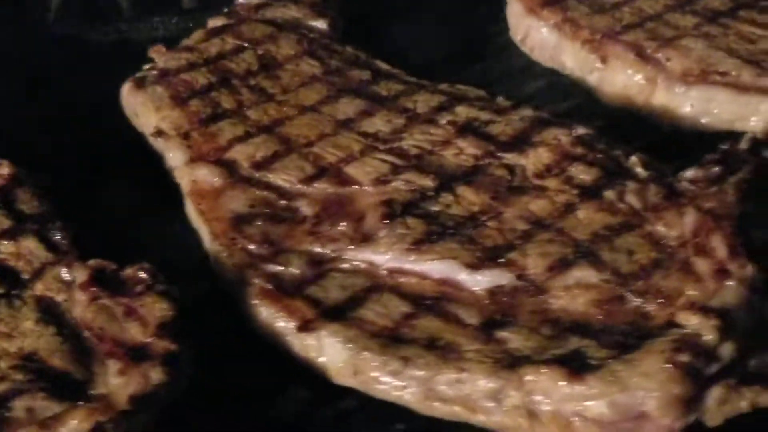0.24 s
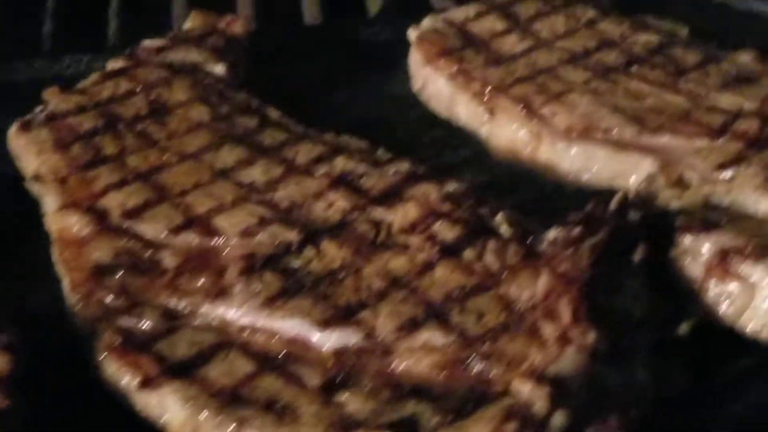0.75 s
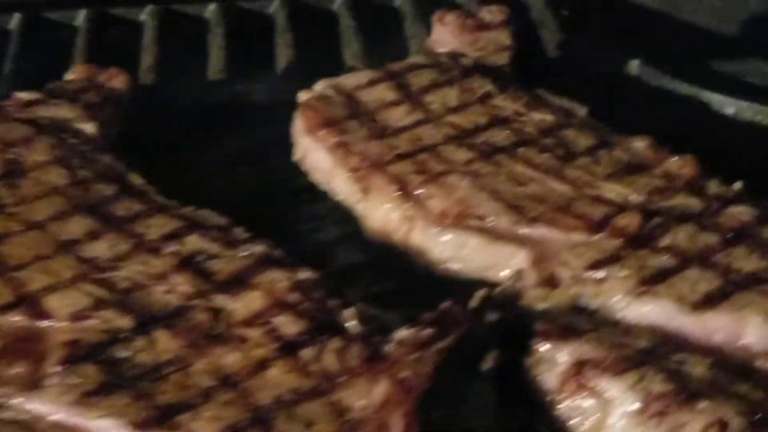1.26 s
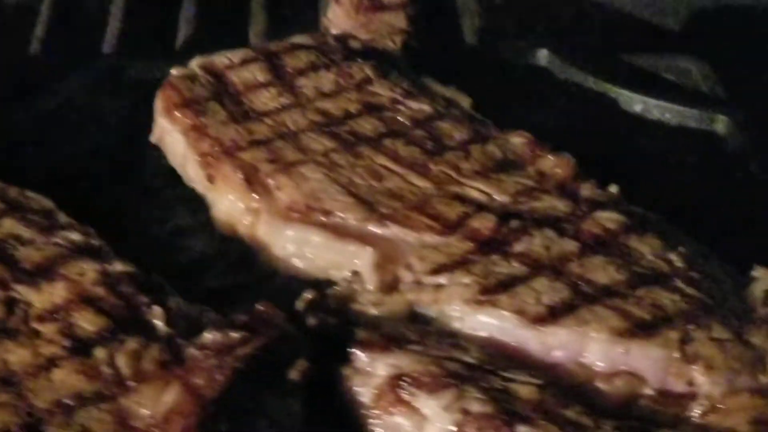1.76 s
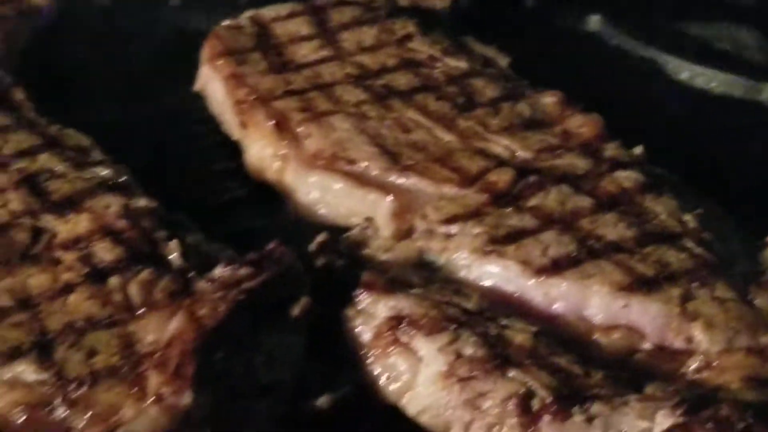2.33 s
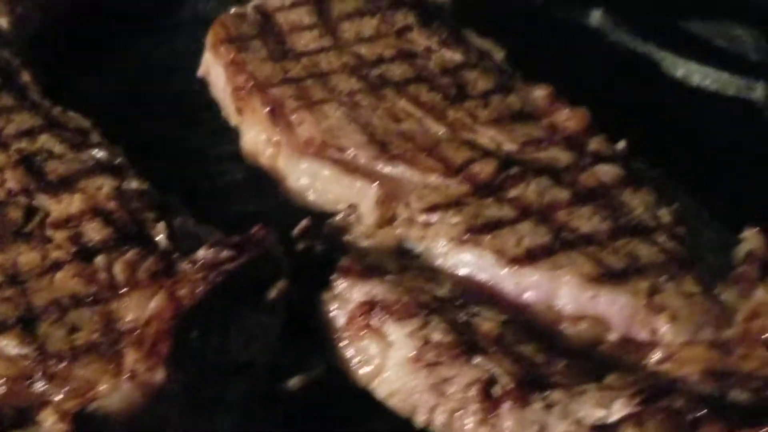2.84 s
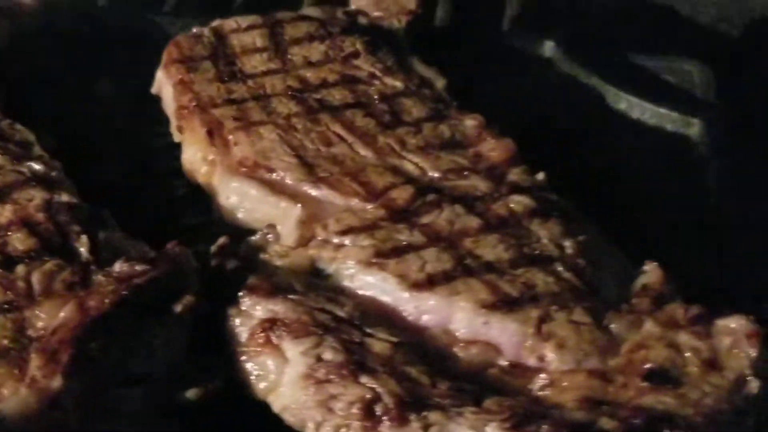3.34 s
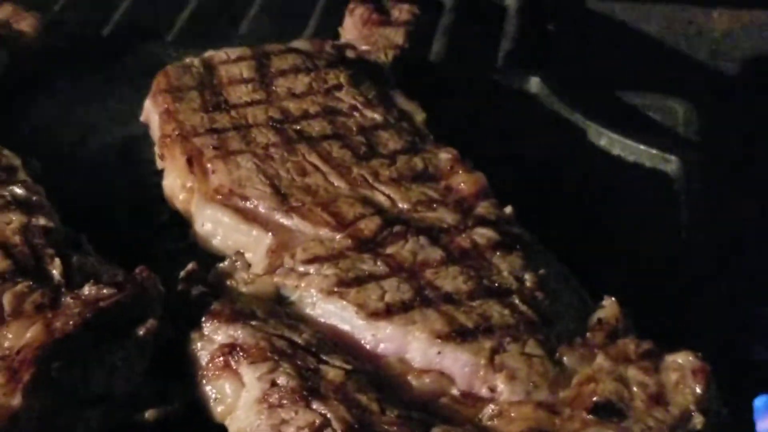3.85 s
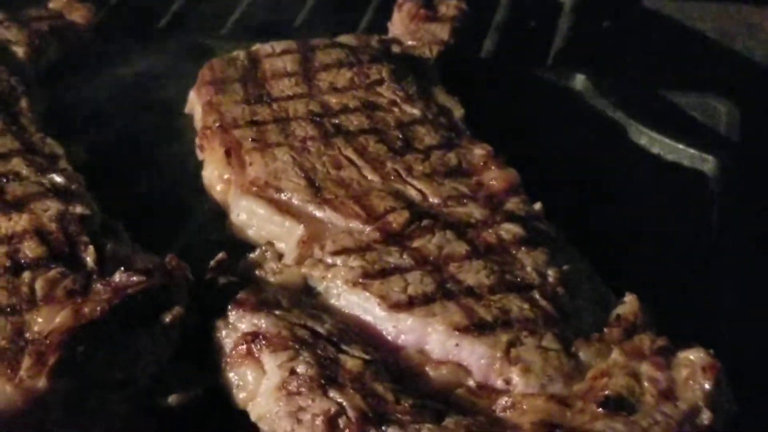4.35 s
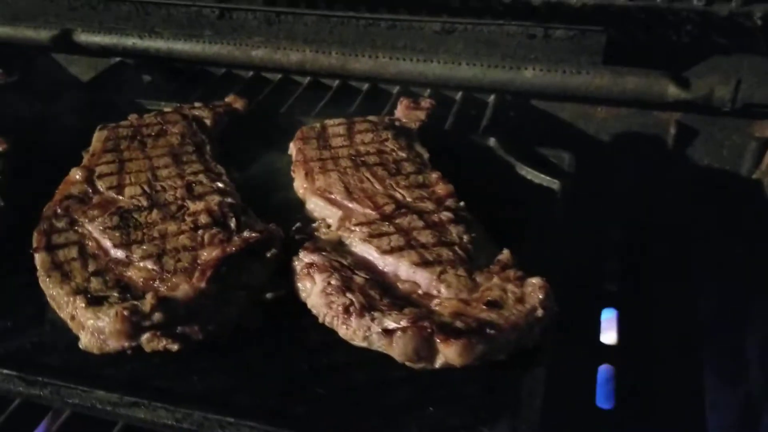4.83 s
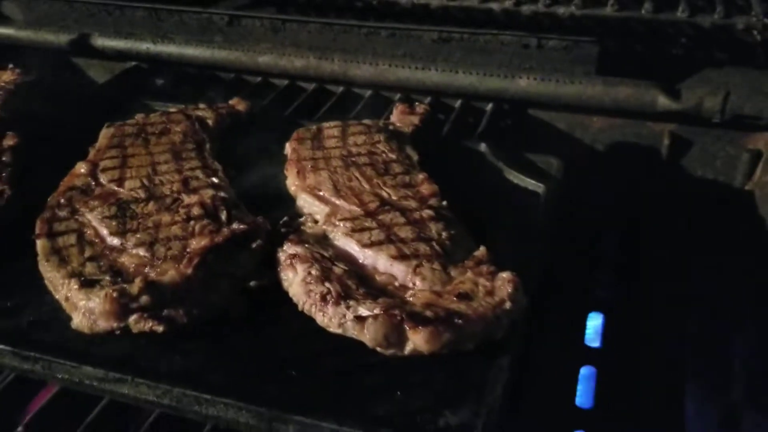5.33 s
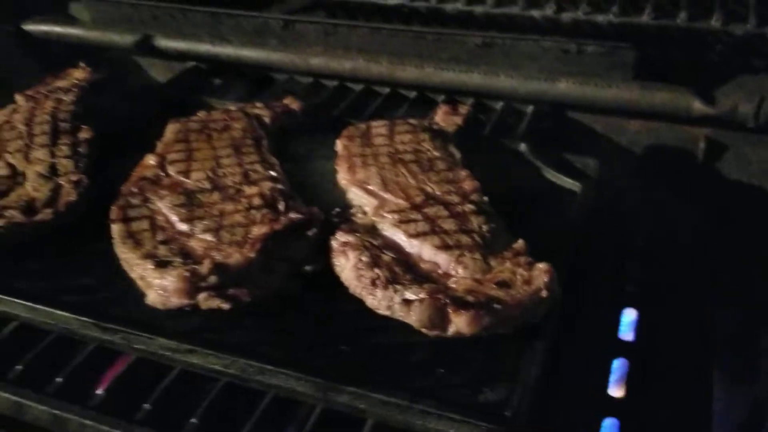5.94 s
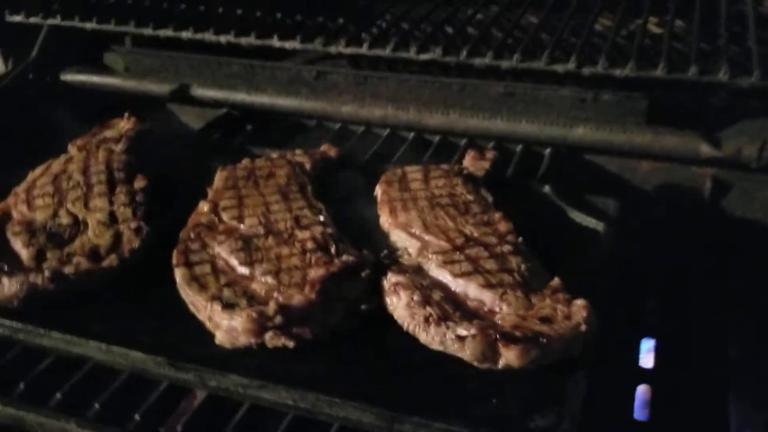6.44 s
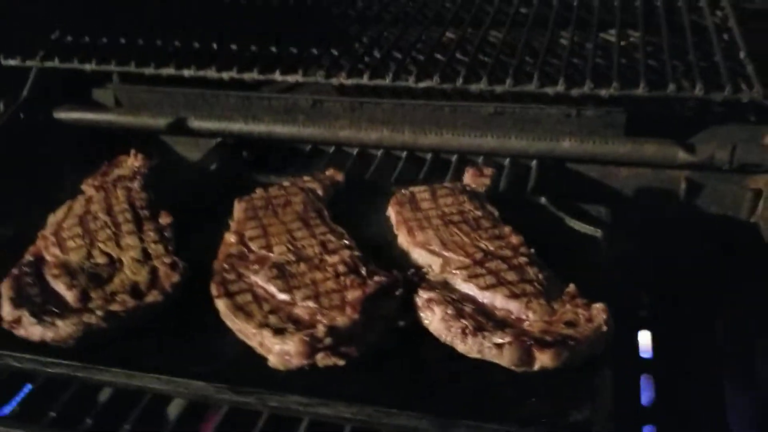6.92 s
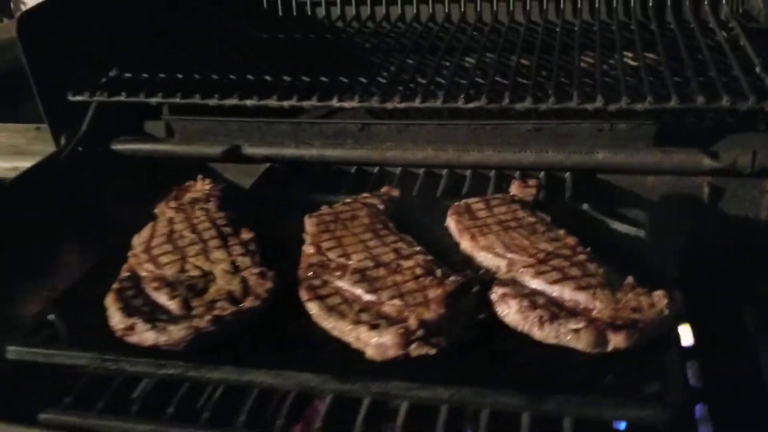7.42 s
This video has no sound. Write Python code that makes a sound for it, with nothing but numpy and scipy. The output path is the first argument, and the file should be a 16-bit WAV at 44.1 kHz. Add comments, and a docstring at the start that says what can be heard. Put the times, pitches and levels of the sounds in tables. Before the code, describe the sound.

From the first moment, steaks sizzle strongly on a gas grill, close to a hand-held stereo microphone: a dense, bright hiss grained with tiny crackles and faint squeaky pips. Hard grease snaps cluster at 0.15-0.7 seconds, the biggest near 0.2, with short juicy spits and a speck striking the microphone. Between 1.1 and 3.1 the sizzle eases slightly while crisp pops scatter, many toward the left, with a spit near 1.8. It swells around 3.8-4.0 with wet spits and a soft low knock; sharp snaps follow at 4.1-4.7. From 4.9 the frying thins, faintest near 5.6, though isolated pops still jump out at 5.55 and 5.9. It builds again after 6, with spits and a bright snap near 7.2, strong by 7.3, and continues to the end around 7.7. Burners rumble softly below throughout, swelling with the sizzle; only a short, tight reflection colours the pops.

```python
"""Steaks sizzle on a hot gas grill, close to a hand-held camera with two microphone ports.
From the start, tiny bubbles of juice burst into a strong hiss; larger ones pop, juice spits, fat specks strike.
Hiss, small pops and rumble swell and sink as the camera moves: faintest near 5.6 s, strong again by 7.3 s.
Bursts are random impulses through resonances, steam is filtered noise, and pops are short impulse responses.
Throughout, the burners rumble below as low coloured noise with broad resonances."""
import sys
import numpy as np
from scipy import signal
from scipy.fft import rfft, irfft
from scipy.io import wavfile

SR = 44100
rng = np.random.default_rng(int(sys.argv[2]) if len(sys.argv) > 2 else 0)


def inscribe(sig):
    """Save sig as 16-bit PCM at rate SR to the path in sys.argv[1].

    A 1-D sig is mono; a 2-D sig holds one channel per row.
    Samples are clipped to [-1, 1] before scaling.
    """
    pcm = np.round(np.clip(np.atleast_2d(sig).T, -1, 1) * 32767)
    wavfile.write(sys.argv[1], SR, pcm.astype(np.int16))


N = 338688
EDGE_HZ = 16000  # upper band limit
TAPS = 512  # length of the bursts' impulse responses, in samples


# loudness of the grill at the camera, before smaller fluctuations: (t/s, level/dB)
GRILL_LEVEL = [(0.0, -32), (0.17, -32), (0.68, -35.5), (1.11, -35), (1.92, -34.5), (2.39, -38),
               (2.82, -38.5), (2.95, -39.5), (3.16, -36.5), (3.31, -36.5), (3.85, -33.5), (4.17, -35.5),
               (4.66, -39), (4.88, -43.5), (5.62, -45), (5.94, -42.5), (6.07, -40.5), (6.52, -38),
               (6.89, -39), (7.12, -36), (7.31, -33.5), (7.68, -35.5)]
# turning of the camera, used as swing about its mean: (t/s, left minus right/dB)
SIZZLE_LEAN = [(0.0, 4.5), (4.9, 9), (7.68, 5)]


def sizzle():
    """Superposition: hiss, crackle and pips add, then share one level envelope and lean with the camera."""
    ticks = crackle(per_s=2600, spread_db=4.2, largest=4.2, octaves=.7, pan_db=1.5)
    fry = from_db(-2.5) * steam(likeness=0.19, patchy_db=1.5, flutter_hz=24.8)
    fry += from_db(-5.5) * lid(ticks, wet_db=-6.5, decay_s=0.0029, first_s=0.0027)
    fry += from_db(-16) * squeaks(count=2800, spread_db=5.5, decay_s=0.0016)
    lean_db = follow(SIZZLE_LEAN, axis=1)
    # the right port takes two thirds of the swing
    side_db = (lean_db - lean_db.mean()) * np.array([[.3], [-.6]])
    level_db = follow(GRILL_LEVEL, axis=1) + .5 * drift(3.4)
    return fry * from_db(level_db + side_db)


def steam(likeness, patchy_db, flutter_hz, count=7):
    """Partial coherence: the finest bubbles merge into a hiss, alike at both ports mainly at low frequency."""
    hz = np.fft.rfftfreq(N, 1 / SR)
    near, other = rfft(rng.standard_normal((2, N)))
    left_gain, right_gain = port_gains(hz)
    # the left port leads by 0.27 ms
    lag = np.exp(-2j * np.pi * hz * 0.00027)
    shared = np.clip(likeness, 0, 1) * lag / (1 + hz / 2500)
    far = shared * near + np.sqrt(1 - abs(shared) ** 2) * other
    spectra = np.array([near * left_gain, far * right_gain])
    # overlapping triangular bands, each fluttering on its own
    place = hz / EDGE_HZ * (count - 1)
    out = np.zeros((2, N))
    for band in range(count):
        hiss = irfft(spectra * np.maximum(1 - abs(place - band), 0), N)
        out += hiss * from_db(patchy_db * drift(flutter_hz))
    return mid_unit(out)


def crackle(per_s, spread_db, largest, octaves, pan_db, count=24):
    """Shot noise: tiny bubbles burst at many spots of the meat, each with its pitch, side and port delay."""
    hz = np.fft.rfftfreq(TAPS, 1 / SR)
    gains = port_gains(hz)
    out = np.zeros((2, N))
    for pitch_hz in np.geomspace(3200, 14000, count):
        chance = rng.random(N)
        size = np.minimum(rng.standard_exponential(N), largest)
        bursts = (chance < per_s / count / SR) * from_db(spread_db * size)
        side = from_db(pan_db * rng.standard_normal() * np.array([[1], [-1]]))
        tick = ringing(gains * hump(hz, pitch_hz, octaves)) * side * rng.choice([-1, 1])
        # the right port hears the spot 0 to 24 samples later
        tick[1] = np.roll(tick[1], rng.integers(-3, 25) % 25)
        out += signal.oaconvolve(bursts[None], tick, axes=1)[:, :N]
    return mid_unit(out)


def squeaks(count, spread_db, decay_s):
    """Pore tones: steam squeezing through the crust gives faint damped sines of a few milliseconds."""
    t = np.arange(SR // 30) / SR
    out = np.zeros((2, N))
    for when, pitch, size, length, side in rng.random((count, 5)):
        hz = 3500 * (14500 / 3500) ** pitch
        age = t / (decay_s * (.5 + length))
        phase = np.array([[0], [side]])
        pip = age * np.exp(-age) * np.sin(2 * np.pi * (hz * t + phase))
        strength_db = spread_db * min(-np.log(1 - size), 3.5)
        add(out, when * N / SR, pip * port_gains(hz)[:, None] * from_db(strength_db))
    return mid_unit(out)


def pops(rows, port_share, lag_s, snap_db, low_cut, crust_db, crust_hz, bounce, bounce_s):
    """Impulsive radiation: a bursting bubble cracks for a few cycles and bounces off the grate."""
    hz = np.fft.rfftfreq(TAPS, 1 / SR)
    # port colour is weakened at the left and deepened at the right
    gains = port_gains(hz) ** np.array([[port_share], [1.2]])
    out = np.zeros((2, N))
    for (s, db, pitch_hz, pan_db), (place, height) in zip(rows, rng.random((len(rows), 2))):
        # smaller, higher bubbles burst faster and spread over more octaves
        octaves = 0.88 * (pitch_hz / 6000) ** 0.78
        band = hump(hz, pitch_hz, octaves) ** 2
        # the skin tears with a sharp snap
        band += from_db(snap_db) * (hz / EDGE_HZ) ** 2
        # a bubble radiates little below its pitch
        band *= 0.11 + 1 / (1 + (low_cut * pitch_hz / (hz + 1)) ** 4)
        # every pop also rings the crust around it
        band += from_db(crust_db) * hump(hz, crust_hz, 0.55) ** 2
        crack = ringing(gains * band)
        bounce_samples = round(bounce_s * (.5 + height) * SR)
        crack += bounce * np.roll(crack, bounce_samples, axis=1)
        crack *= from_db(np.array([[pan_db], [0]])) / np.linalg.norm(crack, axis=1, keepdims=True)
        # the left port leads by up to lag_s, depending on where the bubble sits
        crack[1] = np.roll(crack[1], round(lag_s * place * SR))
        add(out, s, from_db(db) * np.sqrt(2) * crack / np.linalg.norm(crack))
    return lid(out, wet_db=-8.5, decay_s=0.0031, first_s=0.002)


def small_pops():
    """Random arrivals: lesser bubbles pop by chance, their strength following the grill level."""
    per_s, low_hz, high_hz = 7, 3200, 14400
    when, size, pitch, side = rng.random((round(per_s * N / SR), 4)).T
    s = when * N / SR
    db = np.interp(s, *np.transpose(GRILL_LEVEL)) + 25.5 + 2 * (2 * size - 1)
    pitch_hz = low_hz * (high_hz / low_hz) ** pitch
    pan_db = 5 + 13.5 * (2 * side - 1)
    return np.transpose([s, db, pitch_hz, pan_db])


# juice that runs onto the grate and flashes to steam:
# (t/s, level before decay/dB, f/Hz, decay/s)
STEAM_SPITS = [(0.184, -22, 4400, .004), (0.222, -27, 5000, .004), (0.296, -22.5, 4900, 0.0087),
               (1.778, -21.5, 6000, 0.012), (3.836, -27.5, 3000, 0.02), (3.874, -20.5, 3500, 0.017),
               (4.024, -24, 2800, 0.0066), (6.298, -27, 3500, 0.013), (7.155, -26.5, 2600, .009),
               (7.204, -25.5, 2500, 0.0077)]


def spits(octaves, grit):
    """Flash boiling: a gritty puff of band-shaped noise starts at once and decays exponentially."""
    t = np.arange(SR // 8) / SR
    out = np.zeros((2, N))
    for s, db, pitch_hz, decay_s in STEAM_SPITS:
        noise = rng.standard_normal((2, len(t))) * np.exp(grit * rng.standard_normal(len(t)))
        puff = shaped(noise, lambda hz: port_gains(hz) * hump(hz, pitch_hz, octaves))
        add(out, s, from_db(db) * unit(puff) * np.exp(-t / decay_s))
    return out


# specks of fat that land on one port: (t/s, signed push before high-pass/full scale, port 0 left 1 right)
FAT_SPECKS = [(0.2172, -0.26, 1), (0.3056, -0.084, 1), (4.3504, -0.089, 0), (4.7018, 0.04, 0),
              (4.717, -0.029, 0)]
# soft knocks in the grill body: (t/s, left level before decay/dB, f/Hz, decay/s)
BODY_KNOCKS = [(3.969, -31.5, 185, 0.006)]


def thumps(rise_s, push_s, settle_hz, swing_hz):
    """Impact response: a speck's push on one port swings back; the grill body knocks as a damped sine."""
    t = np.arange(SR // 8) / SR
    push = (1 - np.exp(-t / rise_s)) ** 2 * np.exp(-t / push_s)
    push /= push.max()
    # two first-order high-passes make the pressure swing back
    for hz in (settle_hz, swing_hz):
        push = signal.lfilter(*signal.butter(1, hz, "high", fs=SR), push)
    out = np.zeros((2, N))
    for s, peak, port in FAT_SPECKS:
        one_port = np.eye(2)[round(port) % 2][:, None]
        add(out, s, peak * push * one_port)
    for s, db, hz, decay_s in BODY_KNOCKS:
        knock = from_db(db) * np.sin(2 * np.pi * hz * t) * np.exp(-t / decay_s)
        add(out, s, np.array([knock, knock / 2]))
    return out


# colour of the burner noise: (f/Hz, level/dB)
BURNER_COLOUR = [(15, -45), (25, -8.5), (64, -4), (102, 0.5), (165, 1), (207, -5.5), (284, -9.5),
                 (366, -8.5), (438, -13.5), (472, -12), (502, -12), (900, -17.5), (1170, -20.5),
                 (1980, -120)]
# hollow under the lid, more as the camera draws back: (t/s, level relative to the flames/dB)
LID_HOLLOW = [(0, -11), (2.5, -20), (4.2, -11), (6.4, -13), (7.68, -4)]


def burners(level_db, swell_share, apart_db, drone_db):
    """Turbulent combustion noise: flames rumble, drone in the firebox and colour the hollow under the lid."""
    mid, side = shaped(rng.standard_normal((2, N)), lambda hz: colour(BURNER_COLOUR, hz))
    rumble = unit(mid) + from_db(apart_db) * unit(side) * np.array([[1], [-1]])
    rumble += from_db(drone_db) * band_noise(centre_hz=92.9, width_hz=3.6)
    rumble += from_db(follow(LID_HOLLOW, axis=1)) * band_noise(centre_hz=800, width_hz=140)
    # the rumble swells with the sizzle, by a share of its decibels
    swell_db = follow(GRILL_LEVEL, axis=1)
    swell_db = swell_share * (swell_db - swell_db.mean())
    return rumble * from_db(level_db + swell_db + np.array([[1.2], [-1.2]]))


def lid(x, wet_db, decay_s, first_s):
    """Diffuse scattering: open lid and firebox add a short noise tail, different at each port."""
    t = np.arange(SR // 10) / SR
    onset = np.clip(t / first_s, 0, 1) ** 4
    taps = rng.standard_normal((2, len(t))) * np.exp(-t / decay_s) * onset
    taps /= np.linalg.norm(taps, axis=1, keepdims=True)
    return x + from_db(wet_db) * signal.oaconvolve(x, taps, axes=1)[:, :N]


# colour of frying at the left and the right port: (f/Hz, level/dB)
LEFT_COLOUR = [(200, -19), (500, -17), (850, -12.5), (1200, -11.5), (1450, -9), (2100, -5.5), (3000, -3.5),
               (4400, -2.5), (6100, -3.5), (6700, -7), (8100, -7.5), (10000, -2), (11700, 0.74),
               (14000, -1.5), (15800, -4)]
RIGHT_COLOUR = [(200, -29), (600, -34), (900, -17), (1300, -16), (2000, -15), (2700, -14.5), (3300, -12.5),
                (4100, -3), (6100, -5.5), (6800, -9), (8000, -5.5), (10000, -13.5), (11300, -30),
                (13200, -7), (15800, -31.5)]


def port_gains(hz):
    """Frequency response: gain of frying sound at the left and right port."""
    return np.array([colour(LEFT_COLOUR, hz), colour(RIGHT_COLOUR, hz)])


def from_db(db):
    """Logarithmic level: decibels to amplitude gain."""
    return 10 ** (np.asarray(db) / 20)


def unit(x):
    """Normalisation: scales to rms 1."""
    return x / np.sqrt(np.mean(x ** 2) + 1e-20)


def mid_unit(x):
    """Normalisation: scales a stereo sound so that the mean of its ports has rms 1."""
    return x / np.sqrt(np.mean(x.mean(0) ** 2))


def colour(points, hz):
    """Spectral envelope: gain of a table, straight in dB on a log-frequency axis."""
    f, db = np.transpose(points)
    return from_db(np.interp(np.log(hz + 1), np.log(f + 1), db))


def follow(table, axis):
    """Linear interpolation: one column of a curve table at every sample."""
    rows = np.asarray(table)
    return np.interp(np.arange(N) / SR, rows[:, 0], rows[:, axis])


def add(mix, s, sound):
    """Superposition: mixes a stereo sound in at time s."""
    part = mix[:, max(round(s * SR), 0):][:, :sound.shape[1]]
    part += sound[:, :part.shape[1]]


def shaped(x, gain):
    """Zero-phase filtering: applies a gain given as a function of frequency."""
    return irfft(rfft(x) * gain(np.fft.rfftfreq(x.shape[-1], 1 / SR)), x.shape[-1])


def hump(hz, centre_hz, octaves):
    """Broad resonance: a bell on a log-frequency axis, half gain at the given octaves off centre."""
    return 1 / (1 + (np.log2((hz + 1) / centre_hz) / octaves) ** 2)


def band_noise(centre_hz, width_hz):
    """Resonance: noise of rms 1 in one bell-shaped band."""
    return unit(shaped(rng.standard_normal(N), lambda hz: 1 / (1 + ((hz - centre_hz) / width_hz) ** 2)))


def drift(rate_hz):
    """Random modulation: slow noise of rms 1."""
    return unit(shaped(rng.standard_normal(N), lambda hz: (hz > 1) / (1 + (hz / rate_hz) ** 2)))


def ringing(gain):
    """Minimum phase: the causal impulse response with the given magnitude."""
    log = np.log(np.maximum(gain, 1e-5))
    # mirror the log magnitude around the whole frequency circle
    circle = np.concatenate([log, log[..., -2:0:-1]], -1)
    return np.fft.ifft(np.exp(np.conj(signal.hilbert(circle)))).real


# the loudest bubbles of fat that pop: (t/s, strength/dB, f/Hz, left minus right/dB)
LOUD_POPS = [(0.1615, -3, 6500, 0), (0.1837, 8, 4100, -1), (0.2174, -0.5, 6650, -17),
             (0.345, -5, 7400, -17), (0.543, 4.5, 6400, 1.5), (0.5648, -1.5, 9000, -9),
             (0.6355, -9, 12000, -6), (0.6584, 0, 6800, -1), (1.1366, -6.5, 6500, -5),
             (1.2416, -0.5, 10700, 8), (1.3975, -3, 13000, 6), (1.4429, -8, 5200, 5), (1.5427, -3, 6550, 2),
             (1.7796, -6, 7000, 10), (1.9587, -1, 13000, 14), (1.9718, 0.5, 10800, 8),
             (2.0031, 2, 13500, 16), (2.1825, 0.5, 14500, 17), (2.2083, -6, 5600, 4), (2.2705, -1, 4700, 4),
             (2.7635, -3, 6800, 1), (2.9424, -1.5, 11300, 17), (2.9626, -5, 4860, 1), (3.1128, -1, 4760, 0),
             (3.7058, -5, 6500, -5), (3.8748, -5, 3640, 14), (4.1467, -3.5, 4900, 2),
             (4.2354, 1, 13000, 11), (4.3043, -2.5, 7000, 5), (4.3285, -7, 5540, 14),
             (4.3505, 2.5, 15000, 9), (4.3703, -5, 4800, 5), (4.702, 1, 6600, 16), (4.7402, -5.5, 6700, 3),
             (5.1274, -15, 5400, 10), (5.422, -12, 3920, 6), (5.5537, -0.5, 5800, 1),
             (5.9082, 1.5, 5450, 3), (5.9309, -9, 9000, 5), (7.1551, -10, 4000, 5), (7.1645, -4, 3200, 11),
             (7.1793, 2, 12100, 6), (7.3197, -2, 5500, 5)]


def scene():
    """Superposition: everything on and under the grate sounds together."""
    fry = sizzle()
    bubbles = pops([*LOUD_POPS, *small_pops()], port_share=0.82, lag_s=.0003, snap_db=-8.5, low_cut=0.39,
                   crust_db=-9.5, crust_hz=5570, bounce=0.34, bounce_s=.00018)
    puffs = spits(octaves=2.6, grit=0.3)
    blows = thumps(rise_s=.00006, push_s=0.0018, settle_hz=50, swing_hz=25)
    flames = burners(level_db=-57.0, swell_share=0.79, apart_db=-12.5, drone_db=-10.0)
    return fry + bubbles + puffs + blows + flames


def record(dry):
    """Transducer limits: the camera body cuts a narrow dip, full scale clips, then the band is limited."""
    coloured = shaped(dry, lambda hz: 1 - 0.5 / (1 + ((hz - 1220) / 60) ** 2))
    low_pass = signal.firwin(401, EDGE_HZ, window=("kaiser", 8), fs=SR)
    return signal.oaconvolve(np.clip(coloured, -1, 1), low_pass[None], "same")


dry = scene()
out = record(dry)
inscribe(out)
```